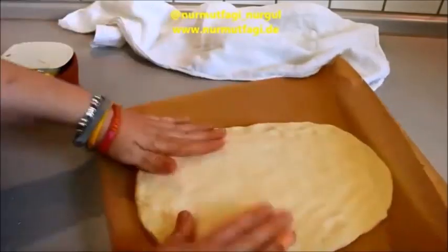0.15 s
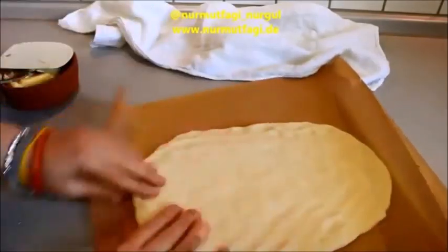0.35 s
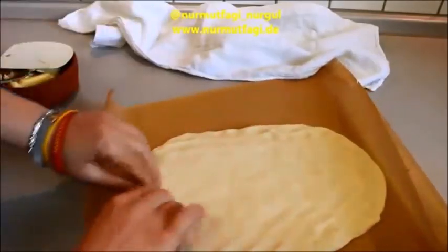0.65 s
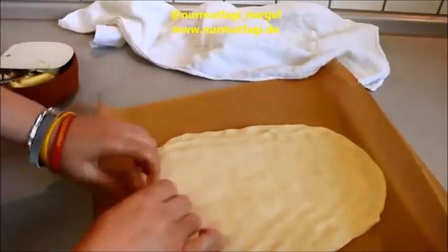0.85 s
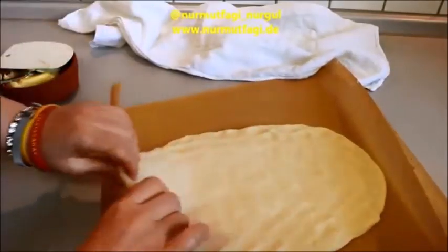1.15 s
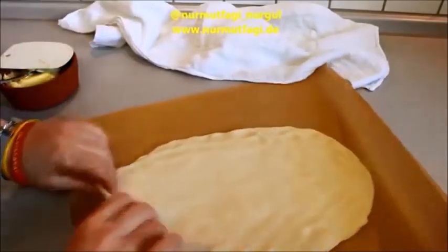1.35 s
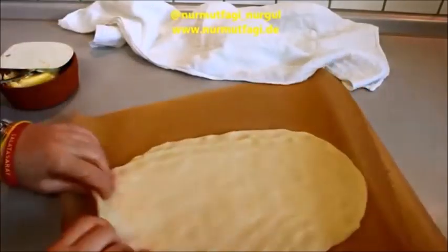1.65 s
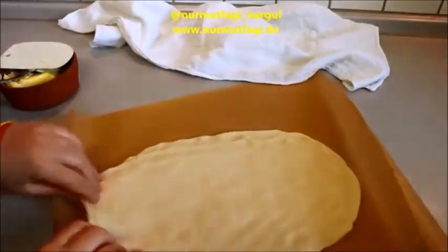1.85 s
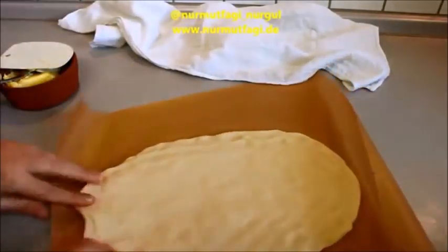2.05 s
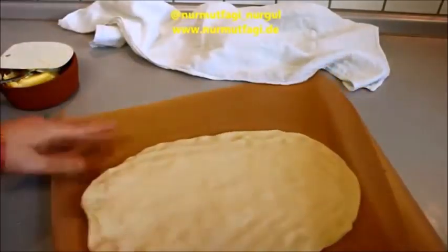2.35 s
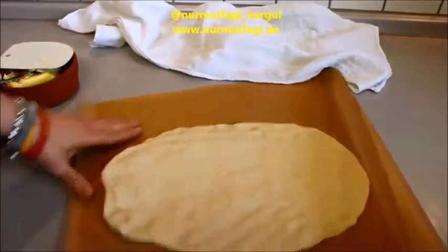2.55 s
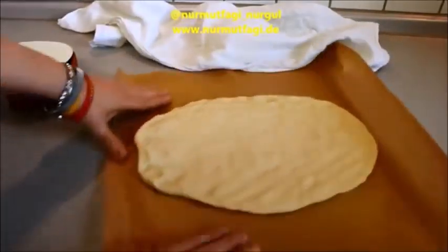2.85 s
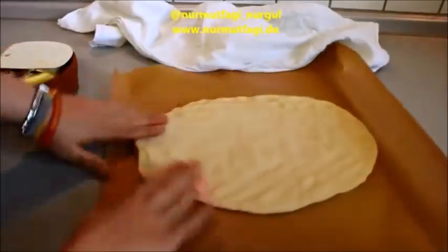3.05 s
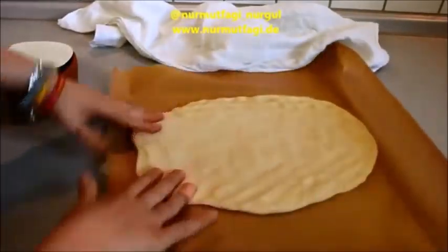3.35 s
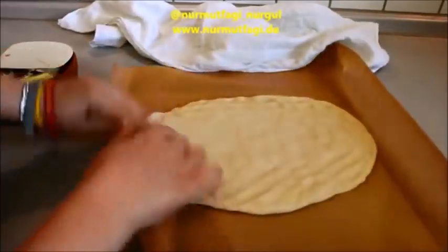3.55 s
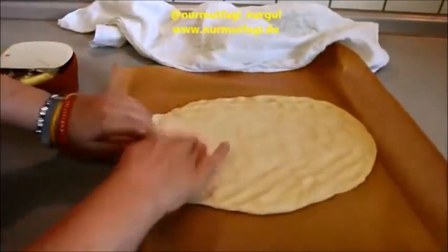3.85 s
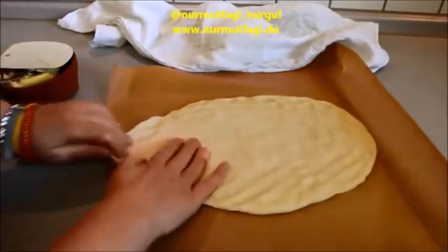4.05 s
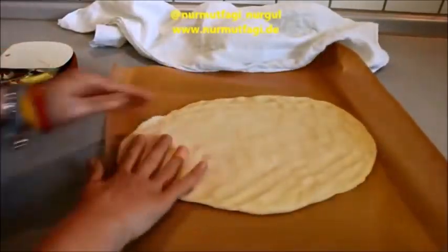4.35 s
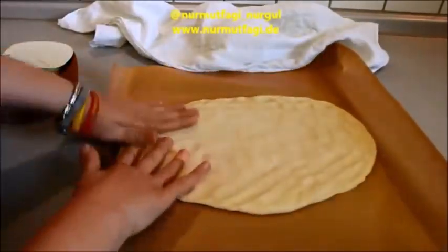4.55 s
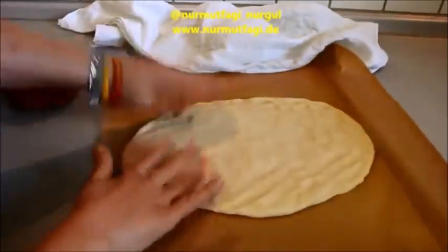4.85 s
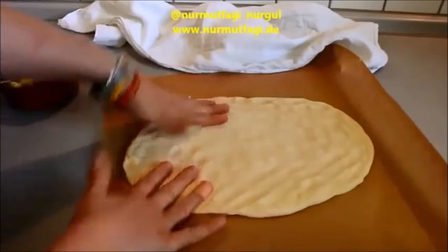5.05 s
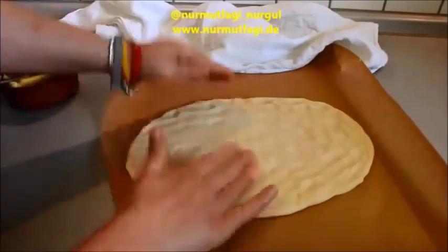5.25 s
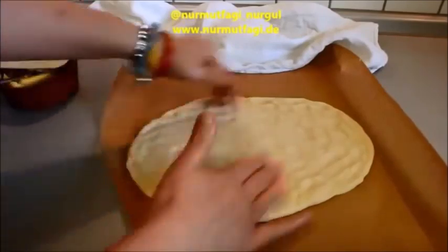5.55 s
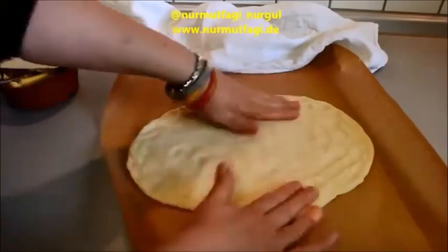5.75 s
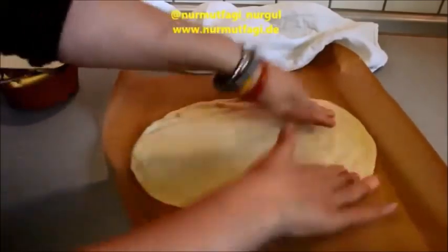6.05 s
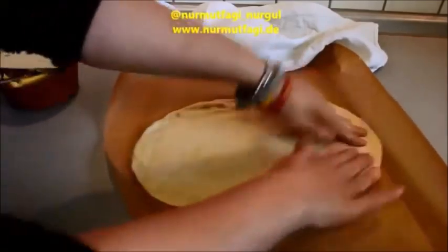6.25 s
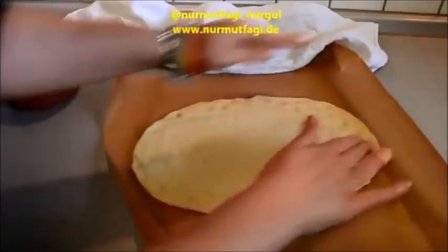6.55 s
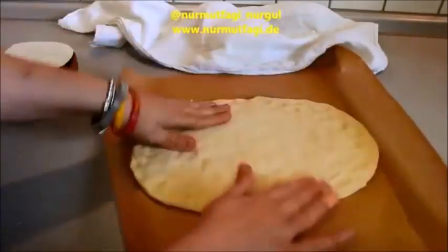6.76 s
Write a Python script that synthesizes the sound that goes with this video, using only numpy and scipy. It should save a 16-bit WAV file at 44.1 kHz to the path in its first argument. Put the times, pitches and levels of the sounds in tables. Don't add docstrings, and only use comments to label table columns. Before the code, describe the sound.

In a small tiled kitchen, close to a small camera, baking paper crackles briskly as fingers pinch dough. The sound cuts out for an instant, then a finger rumbles on the camera at the left. A loud burst of paper dragging and snapping comes midway, followed by quieter rustles, soft hollow palm pats and dull counter thumps.

```python
import sys
import numpy as np
from scipy import signal
from scipy.fft import rfft, irfft, next_fast_len
from scipy.io import wavfile
from scipy.ndimage import uniform_filter1d, map_coordinates

SR = 44100
rng = np.random.default_rng(int(sys.argv[2]) if len(sys.argv) > 2 else 0)


def put_to_file(sound):
    columns = np.atleast_2d(sound).T
    safe = np.clip(columns, -1, 1)
    whole_steps = np.round(safe * 32767)
    wavfile.write(sys.argv[1], SR, whole_steps.astype(np.int16))


def gain_from_db(level_db):
    decades = np.asarray(level_db, float) / 20
    return 10 ** decades


N = 304731


def unit(x):
    return x / np.sqrt(np.mean(x ** 2) + 1e-20)


def along(points, hz):
    f, v = np.transpose(points)
    return np.interp(np.log(hz + 1), np.log(f + 1), v)


def curves(rows):
    s, *columns = np.transpose(rows)
    return [np.interp(np.arange(N) / SR, s, column) for column in columns]


def wobble(rate):
    knots = rng.standard_normal(int(N * rate / SR) + 4)
    return map_coordinates(knots, [np.arange(N) * rate / SR])


def filtered(x, response):
    m = next_fast_len(x.shape[-1] + 8192)
    spectrum = rfft(x, m) * response(np.fft.rfftfreq(m, 1 / SR))
    return irfft(spectrum, m)[..., :x.shape[-1]]


def resonance(f, hz, width_hz):
    return 1j * f * width_hz / (hz * hz - f * f + 1j * f * width_hz)


# (frequency [Hz], correlation [0..1])
LIKENESS = [(60, 0.32), (150, 0.21), (260, 0.63), (450, 0.72), (950, 0.74), (2400, 0.78), (6000, 0.52),
            (14000, 0.016)]


def mid_side_gains(hz, less_alike=0):
    turn = np.arccos(np.clip(along(LIKENESS, hz) - less_alike, -1, 1)) / 2
    return np.array([np.cos(turn), np.sin(turn)])


def spread(pair, spectrum):
    mid, side = filtered(pair, lambda hz: gain_from_db(along(spectrum, hz)) * mid_side_gains(hz))
    return unit(np.array([mid + side, mid - side]))


# (frequency [Hz], t60 [s])
TILE_DECAY = [(200, 0.34), (800, 0.38), (2500, 0.48), (6000, 0.44), (13000, 0.26)]


def walls(colour):
    hz, t, z = signal.stft(rng.standard_normal((2, SR * 2 // 5)), SR, nperseg=256)
    z = z * (np.abs(colour(hz)) * mid_side_gains(hz, less_alike=0.05))[..., None]
    decay = gain_from_db(-60 * t / along(TILE_DECAY, hz)[:, None])
    mid, side = signal.istft(z * decay, SR, nperseg=256)[1]
    tail = np.array([mid + side, mid - side]) * gain_from_db([[-0.7], [0.7]])
    rise = 1 - np.exp(-np.arange(len(mid)) / SR / 0.00074)
    return rise * tail / np.std(tail[:, :SR // 50])


def add(out, s, dry, wet, pan_db):
    start = round(s * SR)
    out[:, start:start + len(dry)] += dry * gain_from_db([[pan_db / 2], [-pan_db / 2]])
    out[:, start:start + wet.shape[1]] += wet


# (peak time [s], level
# [dB], swell [s], brightness [dB])
STROKES = [(0.043, -34.5, 0.018, 6), (0.194, -31.5, 0.054, 5.5), (0.243, -44, 0.022, -6),
           (0.309, -40, 0.44, -9), (0.452, -48, 0.018, 3), (0.47, -46, 0.15, -24), (0.545, -50, 0.084, -12),
           (0.671, -49.5, 0.019, -13), (0.849, -50.5, 0.35, 2), (0.98, -45.5, 0.014, -2),
           (1.091, -47, 0.021, 4.5), (1.19, -64, .03, -3), (1.36, -48, 0.041, 4), (1.41, -39, 0.07, 3.5),
           (1.459, -37, 0.16, 1.5), (1.62, -64.5, 0.16, -51), (1.775, -45, 0.41, -1.5),
           (1.97, -50, 0.51, 0.5), (2.21, -38, 0.38, 1), (2.43, -52, 0.049, 17.5), (2.5, -44, .015, 8),
           (2.542, -29.5, 0.06, 3.5), (2.6, -32, 0.13, 6.5), (2.68, -34, 0.17, 7), (2.81, -48.5, 0.23, 23),
           (2.917, -35.5, 0.36, 7),
           (3.11, -45, 0.3, -5), (3.23, -43.5, 0.15, 7.5), (3.36, -58, 0.57, 9), (3.51, -55, .012, 10),
           (3.519, -45, 0.13, 1), (3.6, -66, .05, -5), (3.69, -53.5, 0.01, 14), (3.729, -49, 0.05, -2),
           (3.86, -56.5, 0.068, 3), (4.0, -50.5, .012, 4), (4.07, -51, 0.18, -2), (4.347, -57, 0.014, 10.5),
           (4.49, -61, 0.37, 7), (4.64, -46, 0.072, 4), (4.74, -56, 0.15, 5), (4.83, -37, 0.046, 1.5),
           (5.021, -42.5, 0.041, 2), (5.16, -50.5, 0.45, 3), (5.165, -53.5, .015, 2),
           (5.43, -40, 0.042, -3), (5.47, -52, .012, -3), (5.52, -61.5, .1, 11), (5.59, -48.5, 0.039, 2),
           (5.647, -39, 0.018, 5), (5.697, -46, 0.043, -2), (5.869, -53, 1, 1.5), (5.97, -55.5, 0.087, 3),
           (6.07, -57, 0.032, -9), (6.16, -52, 0.26, 7), (6.35, -54, 0.088, 11), (6.51, -75, 0.26, 15),
           (6.6, -70, 0.085, -9), (6.728, -57.5, 0.019, -1), (6.835, -49.5, 0.092, 2.5)]


def strokes(rest_db, grows, tilt, settles):
    s, db, swell, bright_db = np.transpose(STROKES)[..., None]
    late = np.arange(0, N / SR + 0.01, 0.002) - s
    swelling_db = 21 * late / np.maximum(swell, 0.01)
    settling_db = -settles * 156 * late
    shape_db = np.where(late < 0, swelling_db, settling_db)
    stroke_db = grows * (db + 45.5) - 45 + tilt * bright_db + shape_db
    power = gain_from_db(2 * stroke_db).sum(axis=0) + gain_from_db(2 * rest_db)
    return np.interp(np.arange(N) / SR, late[0] + s[0], np.sqrt(power))


def crackle(rate, scatter_db, life, share):
    size_db = scatter_db * np.minimum(rng.exponential(1, N), 2.5)
    starts = (rng.random(N) < rate / SR) * gain_from_db(size_db)
    bursts = unit(signal.lfilter([1], [1, -np.exp(-1 / (life * SR))], starts))
    mid_grain = share * bursts + 1 - share
    side_grain = 1.17 * share * bursts + 1 - 0.57 * share
    return np.array([mid_grain, side_grain]) * rng.standard_normal((2, N))


def patchy(x, depth_db):
    z = signal.stft(x, nperseg=256)[2]
    field = uniform_filter1d(rng.standard_normal(z.shape[1:]), size=3, axis=0)
    field = uniform_filter1d(field, size=10, axis=1)
    return unit(signal.istft(z * gain_from_db(depth_db * unit(field)), nperseg=256)[1][:, :N])


# (frequency [Hz], level [dB per Hz])
SHEET = [(710, -27), (1200, -11.5), (1430, -8.5), (2300, -6), (2700, -6.5), (3390, -6), (3650, -6),
         (3920, -5), (8000, -12.5), (10400, -33), (17600, -120)]
BODY = [(120, -14), (240, -12.5), (315, -0.5), (390, -8.5), (488, -1.5), (590, -11), (700, -4.5),
        (1000, -7.5), (1300, -8.5), (1800, -27.5)]
FIZZ = [(5000, -19), (7500, -9), (10000, -9), (13000, -15.5), (15200, -24)]
# (time [s], body level [dB])
CONTACT = [(0, -2), (1.2, 6), (1.7, -4), (2.0, -5.5), (2.3, 3), (2.58, 3.5), (2.8, -4), (3.55, -0.5),
           (3.95, -5.5), (4.3, -1), (4.8, -7.5), (5.1, -1.5), (6.3, -1.5), (6.6, -2.5), (6.9, -1.5)]


def paper():
    creep_db = -69
    flutter = gain_from_db(0.51 * wobble(25) + 1.3 * wobble(70) - 4.5)
    sheet = spread(crackle(rate=500, scatter_db=9, life=0.002, share=0.22), SHEET)
    sheet = patchy(sheet, depth_db=1.6)
    body = spread(crackle(rate=200, scatter_db=2.0, life=0.0024, share=0.2), BODY)
    fizz = spread(crackle(rate=360, scatter_db=27.0, life=0.0018, share=0.15), FIZZ)
    sheet = strokes(creep_db, grows=0.96, tilt=0, settles=1) * sheet
    body_gain = gain_from_db(-10.5 + curves(CONTACT)[0] + 1.9 * wobble(5.9))
    body = body_gain * strokes(creep_db + 10.5, grows=0.84, tilt=-0.29, settles=0.85) * body
    fizz = gain_from_db(-11) * strokes(creep_db + 5.0, grows=0.87, tilt=0.81, settles=1.2) * fizz
    return flutter * (sheet + body + fizz)


def corner(x):
    t = np.arange(SR // 5) / SR
    tail = rng.standard_normal(len(t)) * gain_from_db(-60 * t / 0.14)
    answer = signal.fftconvolve(x, tail[None] / np.linalg.norm(tail), axes=1)[:, :N]
    return gain_from_db(-0.72) * (x + gain_from_db(-7) * answer)


# (time [s], level [dB],
# centre [Hz], wall answer [dB])
CREASES = [(0.029, -28.5, 2800, 7.5), (0.1748, -21, 5700, 4.5), (0.2966, -28, 4100, -9),
           (0.404, -35.5, 2860, 8), (0.443, -24.5, 3150, 1.5), (0.478, -21.5, 1530, 10.5),
           (0.669, -34.5, 2700, 8), (0.7723, -34.5, 3130, 10), (0.84, -27, 2900, -0.5),
           (0.976, -30, 2360, 2), (1.089, -42, 2260, 14.5), (1.262, -44.5, 1630, 11.5),
           (1.3299, -43.5, 1930, 16), (1.359, -42, 3200, 18), (1.7468, -41, 3900, -9),
           (1.78, -31, 6200, -21), (1.9595, -37.5, 2380, 4), (2.1804, -26.5, 4640, 4.5),
           (0.2009, -27.5, 3000, 0),
           (2.424, -37.5, 5700, 11), (2.494, -26.5, 5700, 8), (2.533, -32.5, 3320, 17),
              (2.5709, -23, 2020, -3), (2.6688, -33, 1790, -13), (2.7071, -18, 4430, 5.5),
              (2.8886, -25, 2640, -1), (2.9302, -23, 4370, -15), (3.0734, -39, 2120, 9),
              (3.0946, -33.5, 2390, -5), (3.4031, -45.5, 2430, -5), (3.456, -47, 2360, 17),
              (3.5141, -31, 2600, 7.5), (3.6794, -58, 3530, -12), (3.702, -39, 3500, 5),
              (3.7239, -35.5, 2700, 1.5),
           (3.9652, -54, 1610, 20), (4.565, -51, 4170, 14), (4.6243, -30, 4200, -1),
             (4.813, -34, 3040, 14), (4.8336, -24.5, 3700, 1.5), (5.008, -47, 5200, 19.5),
             (5.0623, -22.5, 3620, 2.5), (5.227, -43, 2750, 15.5), (5.3555, -33.5, 3700, 7),
             (5.409, -23.5, 2120, -0.5), (5.465, -28.5, 3940, 1), (5.642, -27.5, 2410, -7),
             (5.689, -28.5, 2900, -16), (5.763, -40, 4000, 6), (5.96, -42, 2460, 1),
             (5.9994, -51.5, 1790, 13.5), (6.0573, -36, 1600, 0), (6.0885, -37.5, 2300, 6.5),
             (6.3047, -48.5, 1410, 14.5), (6.339, -40, 1340, 6), (6.352, -41.5, 1590, 10),
             (6.4984, -50, 4060, -9), (6.508, -44, 2230, 2.5), (6.7617, -43.5, 2500, -9),
             (6.793, -49.5, 2300, 19)]


def snaps():
    out, t = np.zeros((2, N + SR)), np.arange(1200) / SR
    for s, db, hz, wet_db in CREASES:
        octaves = np.log2(hz / 2600)
        low_db, top_db = -20.5 - 11 * octaves, -19.5 + 5.5 * octaves
        patch = [(150, low_db - 3.5), (650, low_db + 11.5), (1500, -6.0),
                 (4200, -8 + 0.5 * octaves), (9500, top_db + 5.0), (16000, top_db - 22.0)]

        def colour(f):
            peak = 0.63 * np.exp(-(np.log(f / hz + 1e-9) / 0.58) ** 2)
            return gain_from_db(along(patch, f)) + peak

        crack = gain_from_db(-5.5 + 3 * octaves - 60 * np.abs(t - 0.001) / 0.0054)
        crumple = (1 - np.exp(-t / 0.0019)) * gain_from_db(-60 * t / 0.058)
        snap = filtered(rng.standard_normal(len(t)) * (crack + crumple), colour)
        snap = gain_from_db(db - 3.0) * snap / np.abs(snap).max()
        add(out, s - 0.001, snap, gain_from_db(db - 23.0 + wet_db) * walls(colour), pan_db=-1.5)
    return out[:, :N]


# (time [s], level [dB], ring [Hz], t60 [s])
CLICKS = [(0.1595, -36, 3800, .006), (0.1748, -14, 5960, 0.0028), (0.199, -27, 2700, 0.0066),
          (0.2007, -26, 5730, 0.0055), (0.2236, -31, 5000, .005), (0.24, -29, 1770, 0.0075),
          (0.242, -30, 4300, 0.0072), (0.272, -27, 2700, 0.0055), (0.3203, -30.5, 2570, .006),
          (0.351, -42, 2900, .006), (0.451, -33, 2980, .008), (0.479, -25.5, 3340, 0.014),
          (0.505, -35, 1780, 0.013), (0.524, -32, 2200, 0.0097), (1.188, -45.5, 2970, 0.011),
          (1.3587, -36, 3200, .008), (1.455, -35, 9200, 0.0062), (2.406, -50, 3500, 0.028),
          (2.4083, -49, 2800, 0.027), (2.5393, -28, 3270, 0.0047), (2.5727, -19, 2780, 0.0067),
          (2.578, -22.5, 2850, 0.0091), (2.585, -29, 2700, .006), (2.6698, -31, 1900, 0.0089),
          (2.7075, -19, 3640, 0.0044), (2.889, -34, 2440, 0.0056), (2.93, -25, 4940, 0.004),
          (3.0944, -34, 2650, 0.0078), (3.257, -43, 2500, .008), (3.4037, -40.5, 2400, 0.0059),
          (3.5167, -31, 2630, 0.0052), (3.535, -34, 2800, .005), (3.597, -43, 2500, .008),
          (0.2985, -30, 2500, 0.0083), (5.0635, -29, 7140, 0.0061), (5.411, -25.5, 3300, 0.0067),
          (4.1778, -44, 1900, 0.025), (4.179, -46, 2200, 0.0064), (5.054, -34.5, 6100, 0.011),
          (5.1635, -47, 3850, .012), (5.465, -36, 5200, 0.0095), (5.4655, -31, 3240, 0.0079),
          (4.6241, -38.5, 1840, 0.014), (4.811, -35, 2520, 0.01), (5.696, -38, 2780, 0.011),
          (5.93, -46.5, 1800, 0.012),
          (0.0675, -38, 2500, 0.011),
    (0.761, -41, 3420, .006),
    (0.822, -40, 2700, .006),
    (2.8975, -28, 4600, .008),
]
# (time
# [s], level [dB], ring [Hz], t60 [s])
KNOCKS = [(0.84, -52.5, 320, 0.13), (0.985, -57, 324, 0.099), (1.083, -53, 474, 0.097),
          (2.13, -52.5, 317, .15), (2.15, -61, 194, 0.14), (3.47, -61, 402, .1), (5.02, -50, 490, 0.13),
          (2.423, -57, 330, 0.044), (2.463, -51, 330, .05), (2.495, -48, 687, .05), (2.5, -46, 482, 0.062),
          (2.533, -41.5, 1085, 0.088), (2.535, -42, 720, 0.091), (2.569, -39, 1060, 0.096),
          (2.585, -41.5, 924, .07), (2.615, -43, 480, 0.052), (2.62, -39.5, 1043, 0.075),
          (4.36, -59, 500, 0.046), (5.765, -45, 1010, 0.026), (5.803, -47.5, 620, 0.034),
          (6.038, -59, 680, 0.047), (6.092, -47.5, 341, 0.065), (6.096, -44, 882, 0.072),
          (6.218, -58, 620, .03), (6.445, -61, 700, .04), (6.797, -54, 347, .06),
          (6.352, -53.5, 344, 0.057), (6.794, -52, 84, 0.27), (5.49, -57, 104, 0.21),
          (3.27, -56, 100, 0.23), (5.363, -47, 955, 0.034), (6.306, -56, 1000, .04),
          (0.485, -34.5, 1850, 0.1), (0.49, -41, 3300, .1)]
# (delay [s], level [dB])
ECHOES = [(.0085, -4.5), (.021, -9), (.027, -9.5)]


def clicks():
    out, t = np.zeros((2, N + SR)), np.arange(4000) / SR
    for s, db, hz, t60 in CLICKS + KNOCKS:
        ring = gain_from_db(db + 1 - 60 * t / t60) * (1 - np.exp(-t * hz / 0.55)) * np.sin(2 * np.pi * hz * t)
        drift = unit(uniform_filter1d(rng.standard_normal(len(t)), size=260))
        ring *= 1 + 0.5 * np.tanh(t / 0.012) * drift
        edge = np.convolve(rng.standard_normal(40), [0.91, 0.45, -0.43, -0.19], "same") * np.hanning(40)
        ring[:40] += gain_from_db(db - 18 + 2.5 * np.log2(hz / 3000)) * edge
        out[:, round(s * SR):][:, :len(t)] += ring * gain_from_db([[-0.7], [0.7]])
        for delay, echo_db in ECHOES:
            for side in range(2):
                start = round((s + delay + rng.normal(0, 0.0002)) * SR)
                out[side, start:][:len(t)] += gain_from_db(echo_db) * ring
    return out[:, :N]


# (time [s], level [dB], ring [Hz], t60 [s])
TICKS = [
    (2.7053, -9.5, 3650, 0.026),
    (3.2273, -37, 3520, 0.014),
    (4.1774, -50, 3770, 0.04),
    (4.1772, -31, 2580, 0.012),
    (0.4783, -10, 2890, 0.019),
    (4.36, -33, 1950, 0.0093),
    (4.622, -36, 1880, 0.03),
    (6.5078, -37, 2400, 0.044),
]


def ticks():
    out, t = np.zeros((2, N + SR)), np.arange(2500) / SR
    for s, db, hz, t60 in TICKS:
        ring = np.sin(2 * np.pi * hz * t) + 0.7 * np.sin(2 * np.pi * 0.74 * hz * t)
        tick = gain_from_db(db - 12.5 - 60 * t / t60) * (1 - np.exp(-t / 0.0011)) * ring
        colour = lambda f: resonance(f, hz, 0.75 * hz) ** 2
        add(out, s - 0.0005, tick, gain_from_db(db - 29.5) * walls(colour), pan_db=-6.0)
    return out[:, :N]


# (time [s], level [dB], air pocket [Hz], t60 [s])
PATS = [(0.031, -32, 730, 0.02), (0.477, -37.5, 998, 0.19), (0.84, -57.5, 454, 0.26),
        (0.973, -55.5, 522, 0.22), (1.085, -51, 330, 0.11), (2.427, -50, 358, 0.032),
        (3.252, -49.5, 503, 0.053), (3.614, -53.5, 504, 0.034), (4.247, -58.5, 646, 0.062),
        (4.399, -49, 800, 0.028), (4.563, -47, 640, 0.036), (5.017, -38.5, 626, 0.054),
        (5.299, -53, 660, 0.047), (5.36, -30, 602, 0.039), (5.765, -37, 530, 0.04),
        (6.058, -33.5, 550, 0.028), (6.086, -46, 1050, 0.062), (6.304, -50.5, 705, 0.061),
        (6.339, -43, 574, 0.051), (6.72, -57.5, 530, 0.11), (6.762, -39.5, 560, 0.031)]


def pats():
    out, t = np.zeros((2, N + SR)), np.arange(3000) / SR
    for s, db, hz, t60 in PATS:
        colour = lambda f: resonance(f, 0.86 * hz, 480) ** 2
        puff = unit(filtered(rng.standard_normal(len(t)), colour))
        ring = np.sin(2 * np.pi * hz * t) + 0.3 * puff
        slap = gain_from_db(db + 2.0 - 60 * t / t60) * (1 - np.exp(-t / 0.0016)) * ring
        add(out, s - 0.001, slap, gain_from_db(db - 18.0) * walls(colour), pan_db=0.0)
    return out[:, :N]


# (time [s], level [dB], t60 [s], tilt to the upper modes [dB per octave])
THUMPS = [(0.047, -40.5, 0.15, 11), (0.401, -49.5, 0.7, 6.5), (2.202, -63, 0.99, 11),
          (2.499, -49, 0.39, -14), (2.527, -42, 0.33, -3), (3.255, -50, 0.34, 3), (3.99, -54, 0.4, -12),
          (4.238, -64, 0.3, -1), (4.393, -46, 0.26, 1.5), (4.563, -47, 0.37, 2.5), (5.011, -47, 0.31, 8),
          (5.357, -57, 0.17, 14), (5.418, -38.5, 0.37, 2.5), (5.767, -43, 0.39, 3.5),
          (6.054, -66, 0.28, -5), (6.09, -42, 0.23, 6), (6.308, -47.5, 0.43, 2.5), (6.338, -44, 0.46, -4),
          (6.49, -50, 0.38, -1), (6.768, -46, 0.33, 4.5)]
# (frequency [Hz], level [dB])
COUNTER_MODES = [(50, -25), (63, -2.5), (82, 2), (103, -1), (165, -11), (320, -14.5)]
# (time [s], level [dB])
LEAN = [(0.0, -55), (0.69, -60.5), (1.19, -58), (1.35, -73), (1.67, -60), (1.83, -75), (2.48, -81),
        (2.9, -94), (3.29, -68.5), (4.0, -91), (4.58, -72.5), (5.12, -78), (5.5, -70), (5.81, -79),
        (6.16, -68.5), (6.45, -72), (6.58, -86), (6.85, -73)]
# (frequency [Hz], level [dB per Hz])
SHAKE = [(20, -34), (60, -2), (100, -8), (140, -23.5), (220, -19.5), (400, -37)]


def counter():
    out, t = np.zeros(N + SR), np.arange(SR // 2) / SR
    rise = 1 - np.exp(-t / 0.006)
    damping_db = -250 * np.maximum(t - 0.11, 0)
    for s, db, t60, upper_db in THUMPS:
        ring = 0
        for hz, level in COUNTER_MODES:
            faster = (hz / 60) ** 0.39
            strength_db = level + rng.normal(0, 1.5) + upper_db * np.log2(hz / 80)
            gain = gain_from_db(strength_db - 60 * t * faster / (1.06 * t60))
            ring = ring + gain * np.sin(2 * np.pi * hz * t * rng.normal(1, 0.083))
        out[round(s * SR):][:len(t)] += gain_from_db(db - 6.0 + damping_db) * rise * ring
    shake = spread(rng.standard_normal((2, N)), SHAKE)
    return out[:N] + gain_from_db(curves(LEAN)[0] + wobble(9)) * shake


# (time [s], level [dB], direction [+1 push, -1 pull])
JOLTS = [(1.259, -47, 1), (1.303, -40, -1), (1.322, -39, 1), (1.366, -38, 1), (1.379, -36, -1),
         (1.434, -25.5, 1), (1.452, -29, -1), (1.465, -37, -1), (1.475, -40, 1), (1.508, -37, 1),
         (1.544, -33.5, 1), (1.589, -40, 1), (1.6, -41, -1), (1.632, -42, 1), (1.649, -48, -1),
         (1.75, -47, 1), (1.76, -37.5, -1), (1.776, -40.5, 1)]


def jolts():
    t = np.arange(SR, 2 * SR) / SR
    push = 0
    for s, db, way in JOLTS:
        u = np.clip(t - s, 0, 1) / 0.0056
        shape = (1 - np.exp(-5 * u)) * (1 - 0.5 * u) * np.exp(-0.5 * u)
        push = push + np.sign(way) * gain_from_db(db) * 2.0 * shape
    return np.pad(uniform_filter1d(push, size=70), (SR, N - 2 * SR)) * gain_from_db([[0], [-22]])


# (time [s], level [dB])
GRIP = [
    (1.26, -50),
    (1.32, -53),
    (1.34, -53),
    (1.414, -58),
    (1.438, -55),
    (1.496, -51.5),
    (1.738, -52),
    (1.764, -51),
    (1.8, -57),
]
# (frequency [Hz], level [dB per Hz])
RUB = [(8.8, -33), (15, -4), (27, -2.5), (81, -8), (247, -17), (282, -21), (336, -19), (500, -27),
       (650, -25.5), (1100, -120)]


def grip():
    t = np.arange(N) / SR
    held = (t > GRIP[0][0]) & (t < GRIP[-1][0])
    lumps = gain_from_db([2.5 * wobble(30), 2.5 * wobble(31)]) * rng.standard_normal((2, N))
    rumble = unit(filtered(lumps, lambda hz: gain_from_db(along(RUB, hz))))
    level = gain_from_db(curves(GRIP)[0] + np.array([[5.5], [-14]]))
    return uniform_filter1d(held * 1., size=300) * level * rumble


# (frequency [Hz], level [dB per Hz])
AIR = [(59, -59), (100, 14.5), (252, 11), (407, -22), (492, 11.5), (1050, 11.5), (2520, -8), (8880, -42),
       (13000, -35), (15000, 5.5)]


def kitchen_air():
    return gain_from_db(-70.5) * spread(rng.standard_normal((2, N)), AIR)


def scene():
    steady = corner(paper()) + kitchen_air()
    hits = snaps() + clicks() + ticks() + pats() + counter() + jolts() + grip()
    return steady * gain_from_db([[-0.7], [0.7]]) + hits


def low_pass(x):
    return signal.sosfilt(signal.butter(12, 15280, fs=SR, output="sos"), x)


# (start [s], end [s])
GAP = (1.227, 1.2595)


def record(dry):
    t = np.arange(N) / SR
    gain = np.where((t > GAP[0]) & (t < GAP[1]), gain_from_db(-59), 1)
    gapped = dry * uniform_filter1d(gain, size=60)
    mix = filtered(gapped, lambda hz: np.clip((15150 - hz) / 500, 0, 1))
    return low_pass(mix)


dry = scene()
out = record(dry)
put_to_file(out)
```